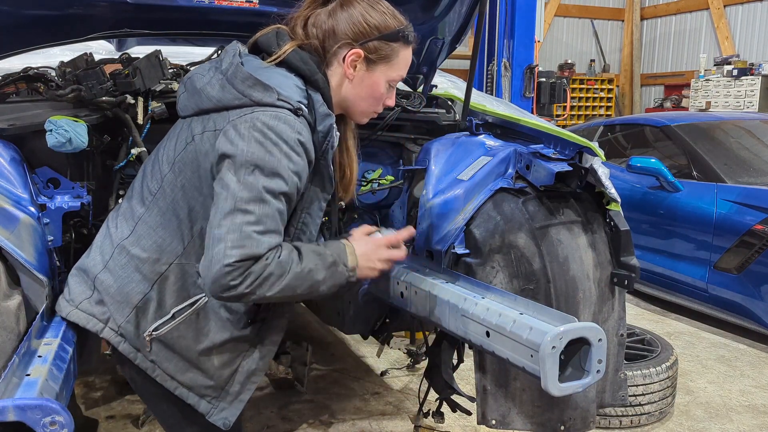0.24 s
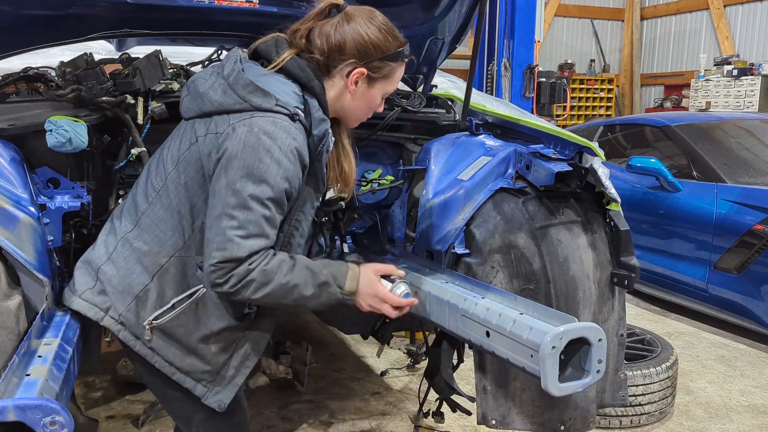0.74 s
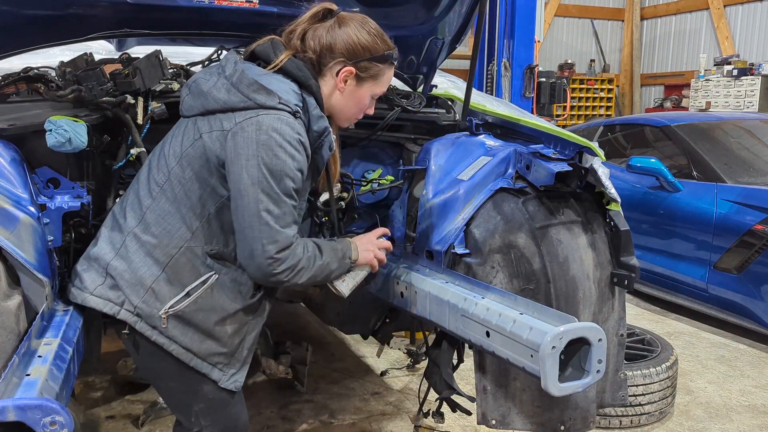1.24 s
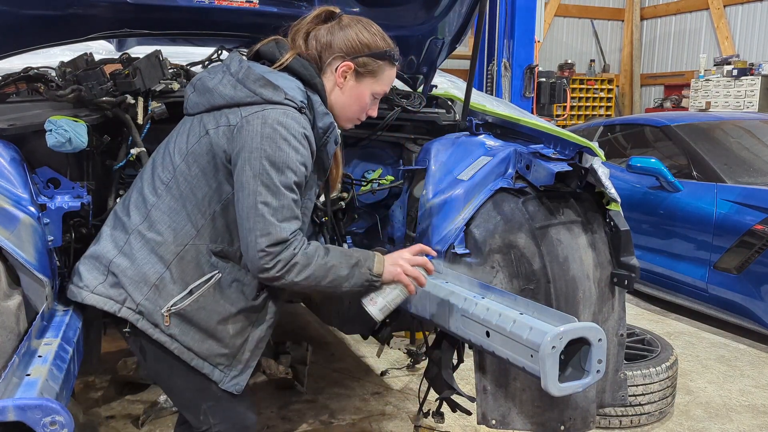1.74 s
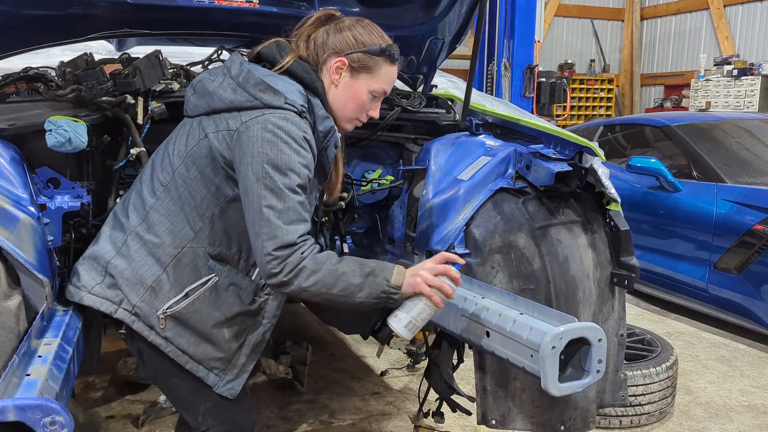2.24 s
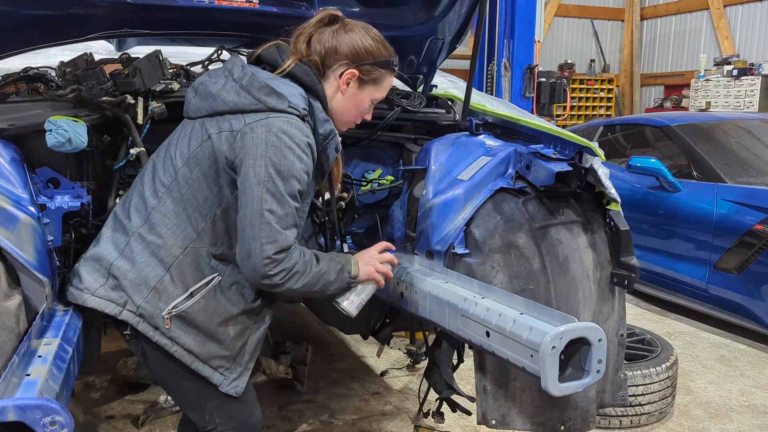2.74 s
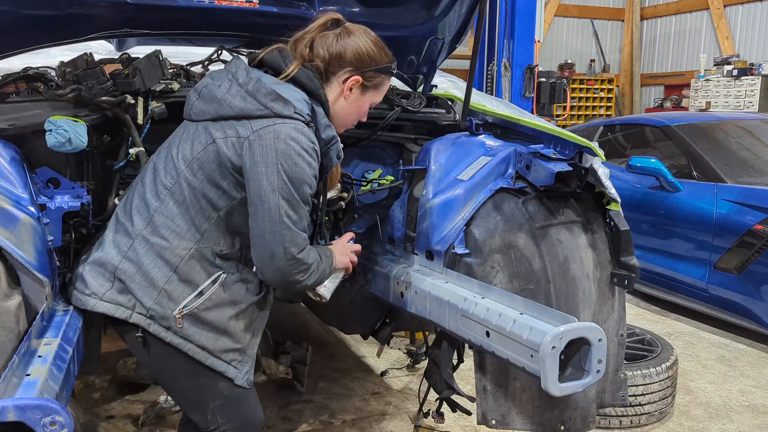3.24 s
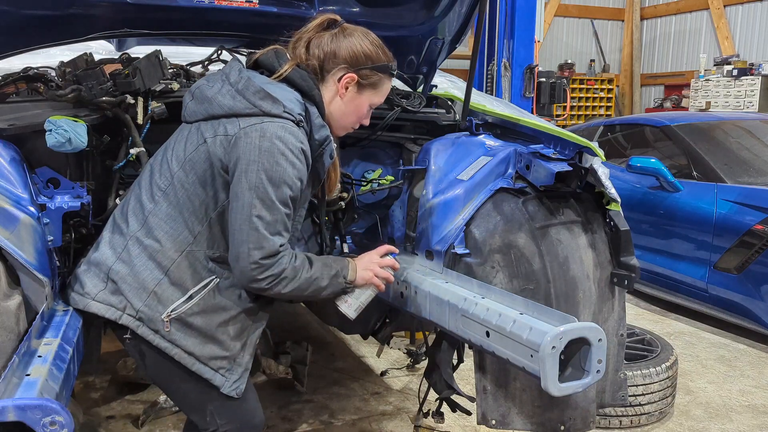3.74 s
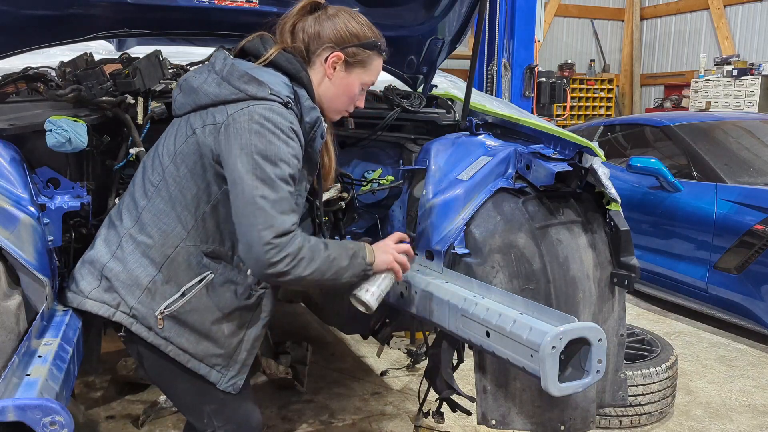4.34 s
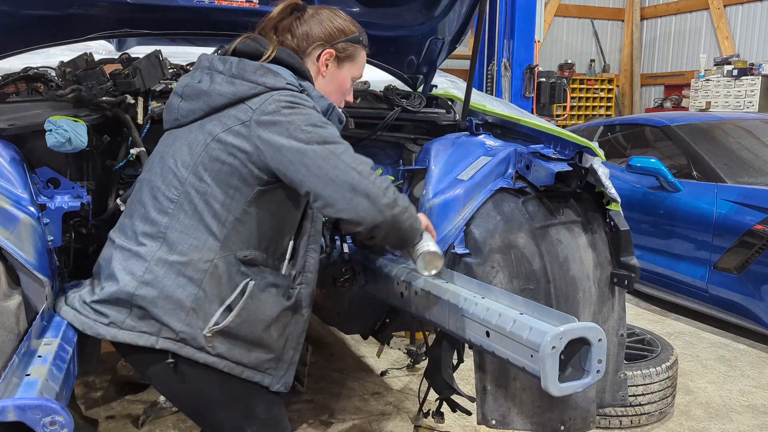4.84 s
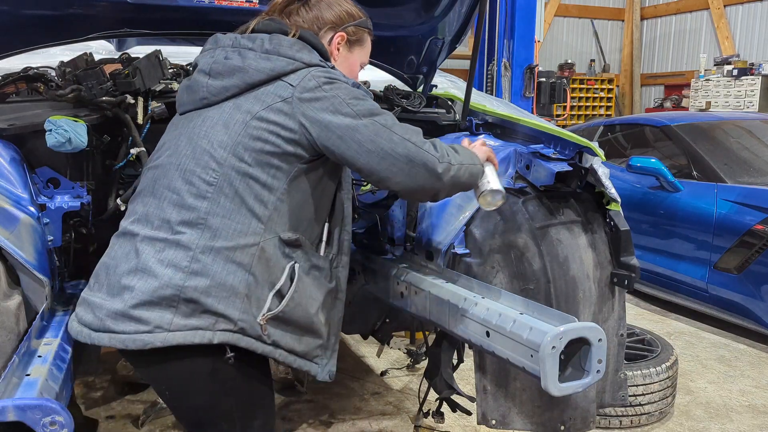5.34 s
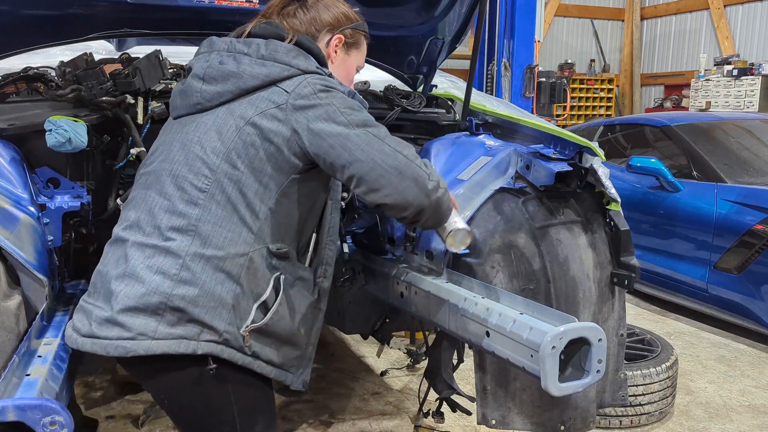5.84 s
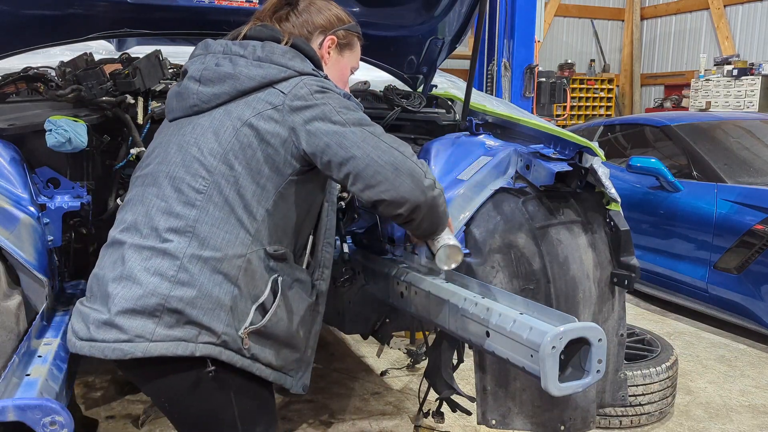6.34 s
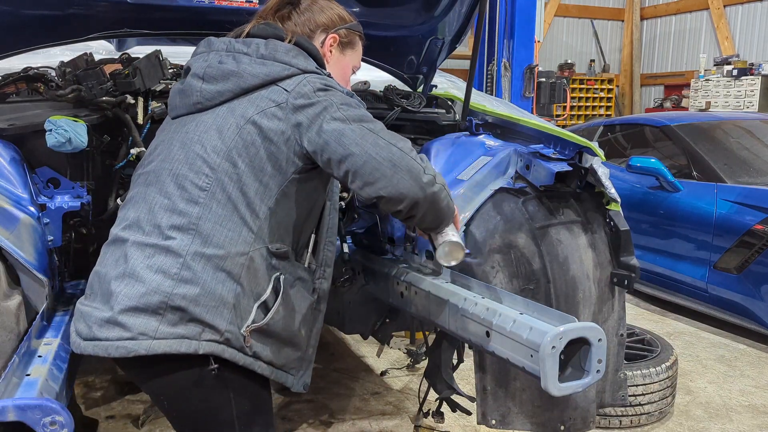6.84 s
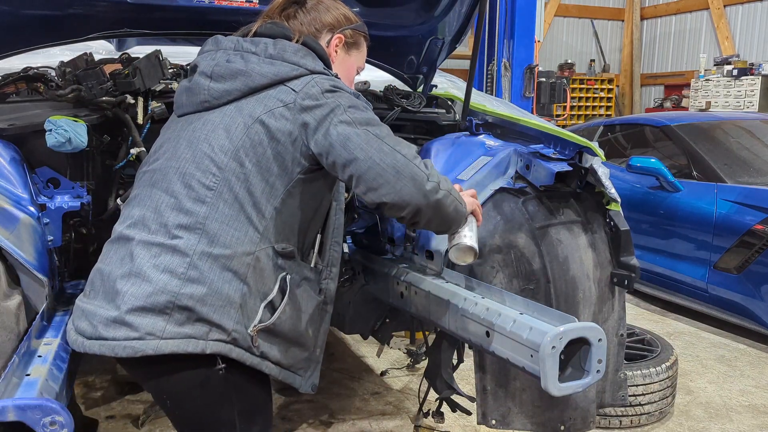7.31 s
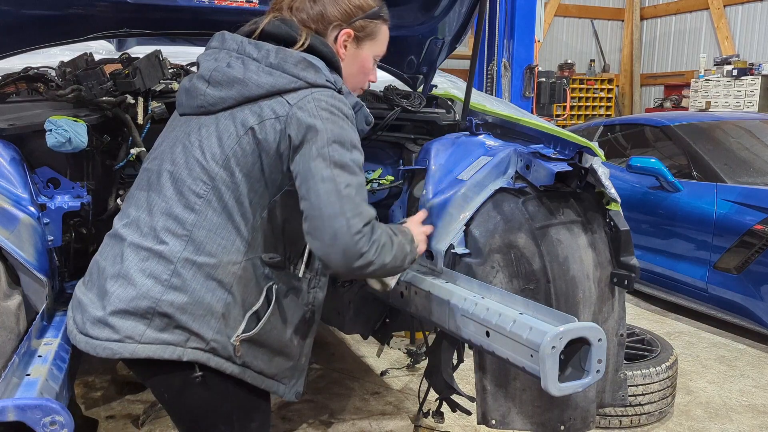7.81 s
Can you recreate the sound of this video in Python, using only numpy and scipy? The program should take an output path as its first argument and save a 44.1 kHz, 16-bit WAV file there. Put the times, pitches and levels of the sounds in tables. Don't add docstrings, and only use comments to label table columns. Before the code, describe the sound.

Close metallic rattling of a paint can gives way to long, then shorter bursts of aerosol hiss, with shoe scuffs and squeaks near the end.

```python
import sys
import numpy as np
from scipy import signal
from scipy.fft import rfft, irfft, next_fast_len
from scipy.io import wavfile
from scipy.ndimage import uniform_filter1d, map_coordinates

SR = 44100
rng = np.random.default_rng(int(sys.argv[2]) if len(sys.argv) > 2 else 0)


def master(y):
    cut = np.clip(np.atleast_2d(y).T, -1, 1)
    pcm = np.round(cut * 32767)
    wavfile.write(sys.argv[1], SR, pcm.astype(np.int16))


def nominal_scale(level):
    x = np.asarray(level, float) / 20
    return 10 ** x


N = 355887
TIME = np.arange(N) / SR


def unit(x):
    return x / np.sqrt(np.mean(x ** 2) + 1e-20)


def along(points, hz):
    f, v = np.transpose(points)
    return np.interp(np.log(hz + 1), np.log(f + 1), v)


def wobble(rate):
    return map_coordinates(rng.standard_normal(int(N * rate / SR) + 4), [TIME * rate])


def filtered(x, response):
    n = x.shape[-1]
    m = next_fast_len(n + SR // 2)
    return irfft(rfft(x, m) * response(np.fft.rfftfreq(m, 1 / SR)), m)[..., :n]


def modes(table):
    def response(f):
        total = 0
        for k, (centre, width, db) in enumerate(table):
            damping = 1j * f * width
            total = total + (-1) ** k * nominal_scale(db) * damping / (centre * centre - f * f + damping)
        return total
    return response


def shape(spectrum):
    return lambda hz: nominal_scale(along(spectrum, hz))


def band(x, hz, sharp):
    peak = signal.iirpeak(hz, sharp, SR)
    return signal.lfilter(*peak, signal.lfilter(*peak, x))


def paired(pair, response):
    # frequency in Hz, left-right likeness from -1 to 1.
    alike = [(60, 0.98), (180, 0.87), (550, 0.36), (1650, -0.023), (4970, 0.05), (15000, -0.038)]

    def mix(hz):
        turn = np.arccos(np.clip(along(alike, hz), -1, 1)) / 2
        return response(hz) * np.array([np.cos(turn), np.sin(turn)])
    mid, side = filtered(pair, mix)
    return np.array([mid + side, mid - side])


def rush(response, patchy_db, size=N):
    z = signal.stft(rng.standard_normal((2, size + 512)), nperseg=512)[2]
    field = uniform_filter1d(rng.standard_normal(z.shape), size=8, axis=1)
    field = uniform_filter1d(field, size=12, axis=2)
    pair = signal.istft(z * nominal_scale(patchy_db * unit(field)), nperseg=512)[1][:, :size]
    return unit(paired(pair, response))


def swells(rows):
    swell_db = 20
    power = np.zeros((2, N))
    for s, db, upper_db, rise, fall in rows:
        near = slice(max(round((s - 3 * rise) * SR), 0), round((s + 3 * fall) * SR))
        late = TIME[near] - s
        fade = nominal_scale(-swell_db * np.maximum(-late / rise, late / fall))
        power[:, near] += nominal_scale([[db], [db + upper_db]]) ** 2 * fade ** 2
    return np.sqrt(power)


def self_noise():
    # frequency in Hz, density in dB per Hz.
    spectrum = [(880, -15.5), (1500, -9.5), (2700, -11), (3390, -17.5), (5020, -18.5), (5490, -28),
                (8290, -15), (10200, -26), (15700, -25)]
    return nominal_scale(-68.5) * rush(shape(spectrum), patchy_db=1.1)


def ventilation():
    # frequency in Hz, density in dB per Hz.
    spectrum = [(13, -57), (22, -20.5), (69, 4), (114, -6), (174, -9), (323, -11), (359, -11.5), (428, -12),
                (520, -16.5), (727, -18.5), (1500, -37), (1950, -62), (3300, -120)]
    level_db, sway_db = -58.5, 0.77
    lull_s, lull_width_s, lull_db = 7.04, 0.055, -5
    lull = lull_db * np.exp(-((TIME - lull_s) / lull_width_s) ** 2)
    return nominal_scale(level_db + sway_db * wobble(5) + lull) * rush(shape(spectrum), patchy_db=1.55)


def hall(x):
    # frequency in Hz, time to fall 60 dB in seconds.
    decay = [(150, 0.56), (1000, 1), (4000, 0.83), (12000, 0.34)]
    hz, t, z = signal.stft(rng.standard_normal((2, SR)), SR, nperseg=256)
    tail = signal.istft(z * nominal_scale(-60 * t / along(decay, hz)[:, None]), SR, nperseg=256)[1]
    late = np.pad(x, ((0, 0), (600, 0)))
    wet = signal.fftconvolve(late, tail / np.linalg.norm(tail[0]), axes=1)[:, :N]
    return paired(wet, np.ones_like)


def jacket():
    # peak in seconds, fold level in dB, swish over fold in dB, rise and fall in seconds.
    moves = [(2.028, -62.5, -8, 0.2, 0.22), (2.3, -80, 2.5, 0.68, 0.11), (3.30, -60.5, -7, 0.067, .4),
             (3.38, -55, -18, .05, .05), (4.136, -72, 1, .06, 0.22), (4.632, -63, 2, 0.44, 0.22),
             (4.75, -68, 2, 0.089, .05), (5.45, -65, -1, 0.16, 0.36), (5.575, -64.5, -12, .2, .05),
             (6.17, -64.5, -0.5, .1, .2), (6.27, -70, 7, .03, 0.081), (6.68, -71.5, 1, .1, .4),
             (6.75, -69, -5, .1, .04), (7.34, -59.5, -12, 0.14, 0.77), (7.454, -73, -14, .03, 0.45),
             (7.545, -68, -4, .01, .02), (7.68, -67, 4, .03, .05), (7.732, -60.5, -9, 0.27, 0.33),
             (7.734, -70, 7, .015, .03), (7.851, -72, 7, .01, .02), (7.85, -67, -7, 0.13, .4),
             (8.07, -66.5, 0, 0.7, .1)]
    # frequency in Hz, density in dB per Hz.
    cloth = [(530, -39), (900, -4), (1160, 0), (1930, -1.5), (2270, -3), (3110, -7), (5000, -18.5),
             (6500, -28), (11000, -120)]
    nylon = [(3500, -7), (5500, -4.5), (8500, -4.5), (10300, -7), (13500, -6), (16000, -3)]
    fold, swish = swells(moves)
    crackle = nominal_scale(1.2 * wobble(120) + 0.9 * wobble(23))
    dull = fold * unit(crackle * rush(shape(cloth), patchy_db=0.5))
    thin = swish * unit(crackle * rush(shape(nylon), patchy_db=-2.0))
    return nominal_scale(-0.5) * dull + nominal_scale(1.0) * thin


def squeaks():
    # start in seconds, level in dB, pitch in Hz, 60 dB decay in seconds, pitch fall per second.
    rubs = [(7.164, -41.5, 2150, 0.12, 2.6), (3.376, -48, 2900, .03, .5), (3.285, -55, 1850, 0.087, 0.46),
            (7.638, -50, 2500, 0.048, .5), (7.722, -49, 1500, 0.033, 0.44)]
    out, t = np.zeros(N + SR), np.arange(SR // 4) / SR
    lowpass = signal.butter(2, 260, fs=SR, output="sos")
    for s, db, hz, t60, fall in rubs:
        rough = signal.sosfilt(lowpass, rng.standard_normal(len(t)))
        tone = np.sin(2 * np.pi * hz * np.cumsum(np.exp(-fall * t)) / SR)
        onset = (1 - np.exp(-t / (0.21 * t60))) ** 2
        out[round(s * SR):][:len(t)] += nominal_scale(db + 14.5 - 60 * t / t60) * onset * tone * (0.32 + unit(rough))
    return out[:N]


def footsteps():
    # time in seconds, peak in dB, pitch in Hz, slap level in dB, 60 dB decay in seconds.
    steps = [(0.893, -38.5, 229, -35, 0.064), (1.495, -52.5, 144, -17, 0.32), (2.228, -49, 169, -26, 0.21),
             (2.354, -47.5, 172, -21, 0.21), (2.847, -42, 106, -20, 0.24), (3.297, -44, 85, -7.5, 0.22),
             (3.493, -48, 135, -16.5, 0.36), (4.12, -43.5, 191, -39, 0.71), (5.358, -51.5, 183, -27, 0.41),
             (6.761, -52.5, 136, -26, 0.19), (7.099, -47, 160, -17.5, 0.47), (7.158, -44.5, 165, -38, 0.35),
             (7.43, -43.5, 250, -12.5, 0.15), (7.639, -50, 368, -7, 0.22), (7.709, -40, 450, -25, 0.56)]
    heel = 34
    out, t = np.zeros(N + SR), np.arange(SR // 3) / SR
    for s, db, hz, slap_db, t60 in steps:
        grit = rng.standard_normal((2, len(t))) * nominal_scale(-60 * t / max(t60, .02)) * (1 - np.exp(-t / 0.002))
        grit *= 1 + 0.74 * np.exp(-t / 0.03)
        grit[:, SR // 400] = heel, 0.51 * heel
        thud, slap = band(grit[0], 1.026 * hz, 0.96), band(grit[1], 546, 1.6)
        thud = thud / np.abs(thud).max()
        slap = nominal_scale(slap_db + 7.5) * slap / np.abs(slap).max()
        out[round(s * SR):][:len(t)] += nominal_scale(db) * (thud + slap)
    return out[:N]


def scuffs():
    # peak in seconds, low level in dB, high over low in dB, rise and fall in seconds.
    drags = [(7.11, -57, -21, .025, 0.13), (7.18, -62.5, 6.5, 0.034, 0.25), (7.47, -45, -13.5, 0.082, 0.34),
             (7.644, -58, 0.5, .015, .12), (7.696, -52.5, -14, 0.14, 0.087), (7.73, -57.5, 15, .035, 0.18),
             (8.07, -76, 7, .3, .1)]
    # frequency in Hz, width in Hz, level in dB.
    sole_low = [(172, 24, 0), (325, 95, -2)]
    sole_high = [(475, 54, -2.5), (715, 65, 0), (984, 60, -1)]
    low, high = swells(drags)
    slips = nominal_scale(2.8 * wobble(45))
    dull = low * unit(slips * rush(modes(sole_low), patchy_db=0.0))
    bright = high * unit(slips * rush(modes(sole_high), patchy_db=-1.0))
    return nominal_scale(-4.5) * (dull + bright)


def slosh():
    # time in seconds, roll level in dB.
    shaking = [(0, -47), (.33, -51.5), (.7, -52), (.85, -50), (.968, -48.5), (1.17, -55.5), (1.45, -70)]
    # frequency in Hz, density in dB per Hz.
    rumble = [(290, -39), (500, -18), (692, -9), (833, -10.5), (957, -10.5), (1830, -5.5), (2180, -4),
              (8000, -22), (10400, -49), (17600, -120)]
    paint = [(3000, -16), (6000, -4), (8500, 4), (10300, 0), (13000, -4.5), (16000, -1.5)]
    shaken = 2 * SR
    s, db = np.transpose(shaking)
    t = TIME[:shaken]
    effort = np.clip((s[-1] - t) / .1 + 1, 0, 1) ** 2 * nominal_scale(np.interp(t, s, db))
    grains = nominal_scale(0.95 * wobble(41) + 2.2 * wobble(400))[:shaken]
    roll = unit(grains * rush(shape(rumble), patchy_db=1.7, size=shaken))
    splash = unit(grains * rush(shape(paint), patchy_db=.5, size=shaken))
    return np.pad(effort * (roll + nominal_scale(-9) * splash), ((0, 0), (0, N - shaken)))


def contacts():
    # time in seconds, strength in dB, bare wall and steel tick over it in dB, floor bounce in dB.
    blows = [(0.031, -20.5, -4.5, -12, -6), (.0876, -32.5, -4, -9.5, 0), (0.2273, -26, -6.5, -12.5, -2.5),
             (.345, -24, -0.5, -12, -2.5), (0.6244, -29, -13, -10.5, -2.5), (.63, -35, -15, -5.5, -2),
             (.636, -36.5, 3, -6.5, -6), (.77, -26.5, 1.5, -9.5, 3), (0.798, -26.5, -9, -16, -10),
             (0.865, -22, -19.5, -18, 3), (.885, -27.5, 0, -5, -7), (1.0579, -24, -7, -13.5, -23),
             (1.3682, -28, -6.5, -13, -10)]
    # time in seconds, strength in dB, bare wall over it in dB, chatter in dB.
    rebounds = [(.054, -34, -20, -1), (0.108, -35.5, -7, 2), (0.1325, -33.5, -3.5, -3),
                (.172, -38, -22, -3), (0.2175, -34, -7, -2), (.239, -41.5, 5.5, 2), (0.2505, -32.5, -2, 0),
                (.369, -37.5, -18, 10), (0.389, -38.5, 0.5, -4), (.4337, -34, -18, 2.5),
                (.642, -34, -12, 1), (.676, -38.5, -6, 5), (.895, -30, -3, 6), (.906, -32, -1, 1.5),
                (.938, -34.5, 2.5, -3), (1.0326, -32, -12, 1), (1.451, -38, -21, -6), (1.461, -36.5, -8, 1),
                (1.482, -50.5, -3, -1), (1.519, -40.5, -21, 4.5), (1.566, -42.5, -24, 9)]
    touches = []
    for s, db, wall, tick, floor in blows:
        touches.append((s, db, db + wall, db + tick, floor, -1))
    for s, db, wall, chatter in rebounds:
        tick = -11 + 0.42 * wall
        touches.append((s, db, db + wall, db + tick, -10, chatter))
    return sorted(touches)


def knocks():
    # frequency in Hz, width in Hz, level in dB.
    body_modes = [(1040, 265, 3), (1570, 520, 3), (2145, 430, 5.5), (2745, 620, 1.5)]
    wall_modes = [(3640, 1080, 0.5), (4390, 790, 0.5), (6250, 990, -2.5)]
    tick_modes = [(7400, 2500, 2.5), (11700, 1700, 1.5), (14300, 3900, -3.5)]
    # delay in seconds, level in dB.
    near = [(.0062, -10), (.0098, -9), (.014, -32), (.021, -28), (0.029, -18)]
    contact_s, floor_s = .001, .0034
    soft_db = 4.5
    treble_loss = np.array([0, 150, 700])
    push, t = np.zeros((3, 2, 2 * SR)), np.arange(SR // 10) / SR
    for s, body_db, wall_db, tick_db, bounce_db, chatter_db in contacts():
        blow = np.zeros((3, 2, 2 * len(t)))
        softened = np.array([0, 0, max(body_db - tick_db - soft_db, 0)])
        for delay, echo_db in [(0, 0), (floor_s, bounce_db)] + near:
            rough = 0.25 * rng.standard_normal((2, len(t))) * nominal_scale(-60 * t / (contact_s + 0.23 * delay))
            rough[:, 0] = 1
            dulled = nominal_scale(echo_db - softened - delay * treble_loss)[:, None, None]
            blow[..., round(delay * SR):][..., :len(t)] += dulled * rough / np.linalg.norm(rough[0])
        spikes = rng.standard_normal((2, len(t))) * nominal_scale(7.2 * rng.standard_normal(len(t)))
        chatter = spikes * nominal_scale(-60 * t / 0.045) * (1 - np.exp(-t / 0.0019))
        blow[..., :len(t)] += nominal_scale(chatter_db) * chatter / np.linalg.norm(chatter[0])
        at = round(s * SR)
        strength = nominal_scale([body_db + 21.0, wall_db + 26.5, tick_db + 26.5])[:, None, None]
        push[..., at:at + blow.shape[-1]] += strength * blow
    body = filtered(push[0], modes(body_modes))
    wall = filtered(push[1], modes(wall_modes))
    tick = filtered(push[2], modes(tick_modes))
    radiated = signal.butter(3, (800, 6600), "bandpass", fs=SR, output="sos")
    can = tick + signal.sosfilt(radiated, body + wall)
    return np.pad(can, ((0, 0), (0, N - 2 * SR)))


def valve():
    # opens and shuts in seconds, jet level in dB, change over the burst in dB, edge over jet in dB.
    bursts = [
        (1.455, 1.922, -46.5, 4, -2),
        (2.347, 3.148, -48, -4.5, -1.5),
        (3.392, 4.05, -48, 1.3, -1),
        (4.761, 5.403, -48, -0.2, -0.7),
        (5.59, 6.103, -49, 0, -1),
        (6.317, 6.607, -50, -0.5, 0.5),
        (6.777, 6.956, -49.5, -1.5, -2),
        (7.116, 7.292, -48, 2, -3.5),
    ]
    open_s, shut_s = 0.017, 0.012
    build_db, build_s, sag_db, sag_s = -2, 0.011, -3.5, 0.01
    out = np.zeros((2, N))
    for opens, shuts, db, change_db, edge_db in bursts:
        near = slice(round(opens * SR) - SR // 20, round(shuts * SR) + SR // 20)
        since, left = TIME[near] - opens, shuts - TIME[near]
        gate = np.clip(since / open_s + 1, 0, 1) * np.clip(left / shut_s + 1, 0, 1)
        flow_db = db + change_db * (since / (shuts - opens) - .5)
        flow_db += build_db * np.exp(-since.clip(0) / build_s) + sag_db * np.exp(-left.clip(0) / sag_s)
        out[:, near] += gate ** 2 * nominal_scale(flow_db) * nominal_scale([[0], [edge_db]])
    return out


def spray():
    # frequency in Hz, density in dB per Hz.
    jet_spectrum = [(290, -39), (500, -13.5), (747, -9.5), (839, -14), (1010, -9), (2720, -4.5), (6390, -4),
                    (7370, -3), (9920, -5.5), (11000, -7.5), (14300, -7), (22000, -120)]
    edge_spectrum = [(6000, -21), (9500, -50), (10500, -6), (12200, 3), (13700, 2), (14800, 4.5),
                     (15900, 5.5)]
    jet, edge = valve() * nominal_scale([.5 * wobble(5.8), 1.2 * wobble(14)])
    flutter = nominal_scale(0.52 * wobble(30) + 0.71 * wobble(300))
    jet_hiss = jet * rush(shape(jet_spectrum), patchy_db=1.5)
    edge_hiss = edge * rush(shape(edge_spectrum), patchy_db=0.5)
    return flutter * (jet_hiss + edge_hiss)


def scene():
    can, hiss, rubs = knocks(), spray(), squeaks()
    feet = footsteps() + scuffs()
    echo = hall(nominal_scale(-10.0) * can + nominal_scale(-13.5) * hiss + nominal_scale(-2.0) * feet + nominal_scale(-10) * rubs)
    close = can + slosh() + hiss + feet + rubs + jacket()
    return close + echo + ventilation() + self_noise()


def top_cut(x):
    return signal.sosfilt(signal.butter(12, 16970, fs=SR, output="sos"), x)


def record(dry):
    # frequency in Hz, gain of both ports in dB.
    limit = [(40, 0), (15760, 0), (15800, -14), (15880, -20), (15930, -60)]
    # frequency in Hz, left minus right in dB.
    ports = [(300, 0), (900, -1), (2400, -0.5), (4400, 1), (6200, 0), (8300, -6.5), (9800, -2),
             (12400, 9.5), (15500, 7)]
    halves = np.array([[.5], [-.5]])
    mix = filtered(dry, lambda hz: nominal_scale(along(limit, hz) + along(ports, hz) * halves))
    return top_cut(mix)


dry = scene()
out = record(dry)
master(out)
```